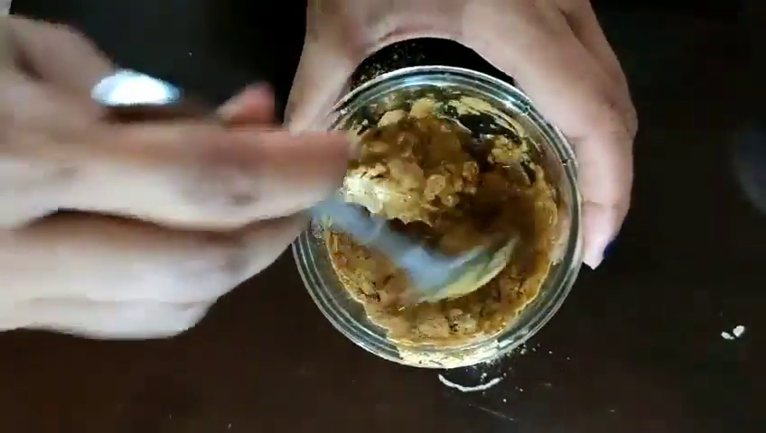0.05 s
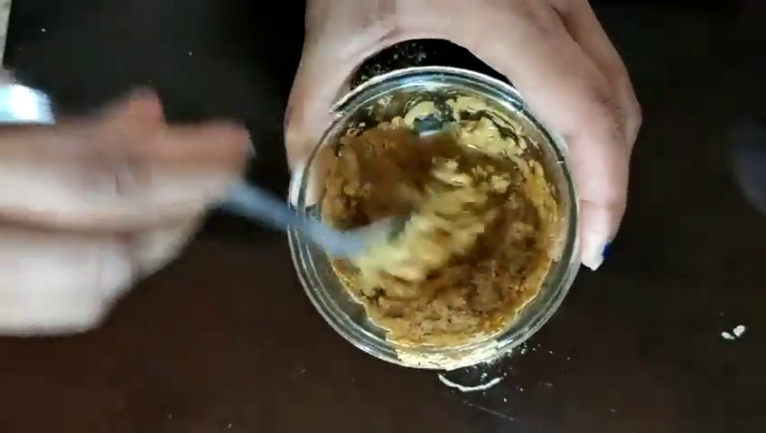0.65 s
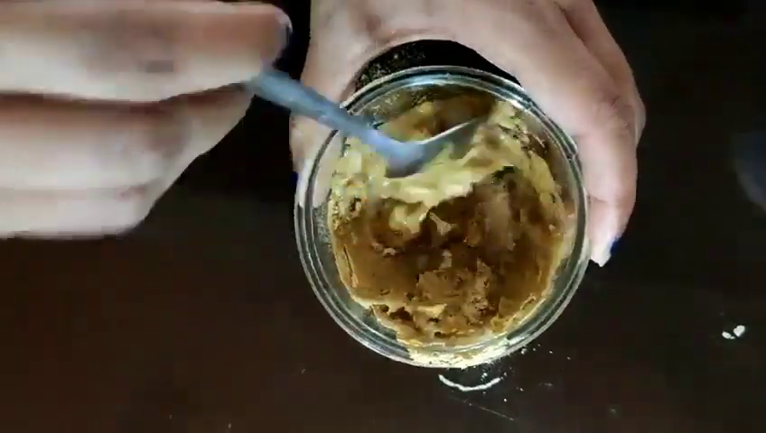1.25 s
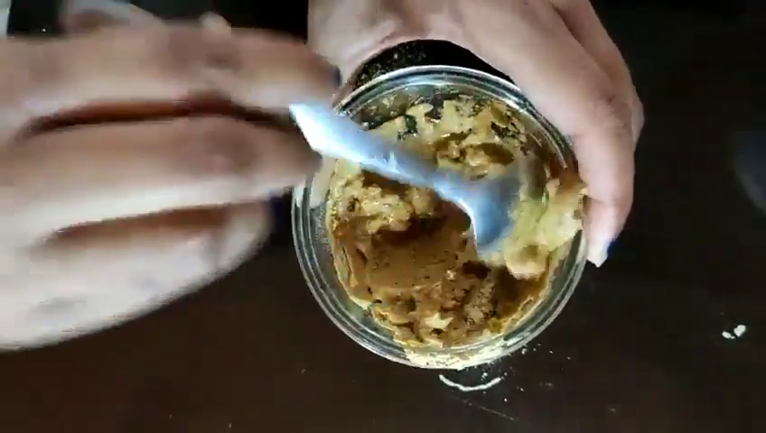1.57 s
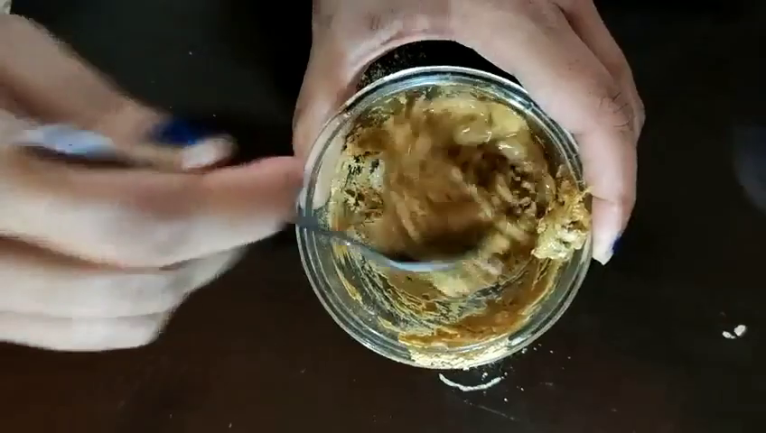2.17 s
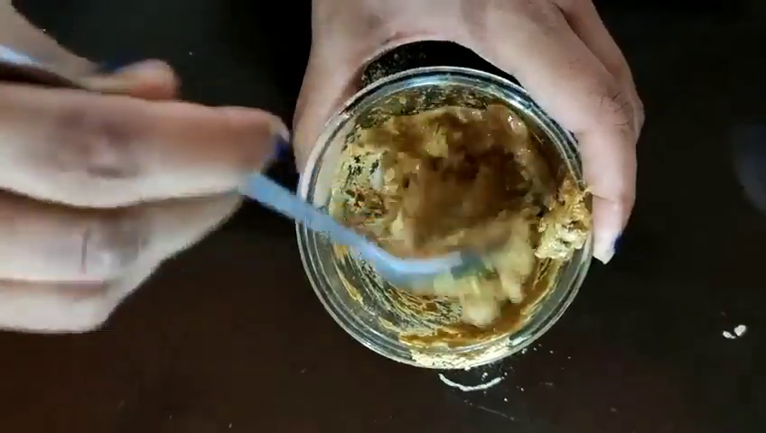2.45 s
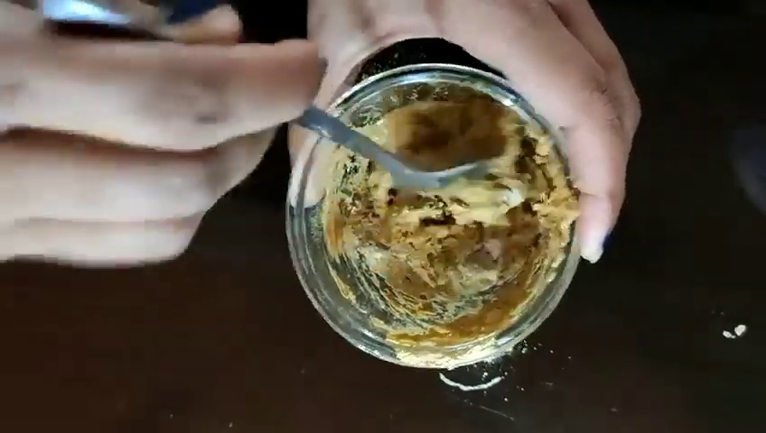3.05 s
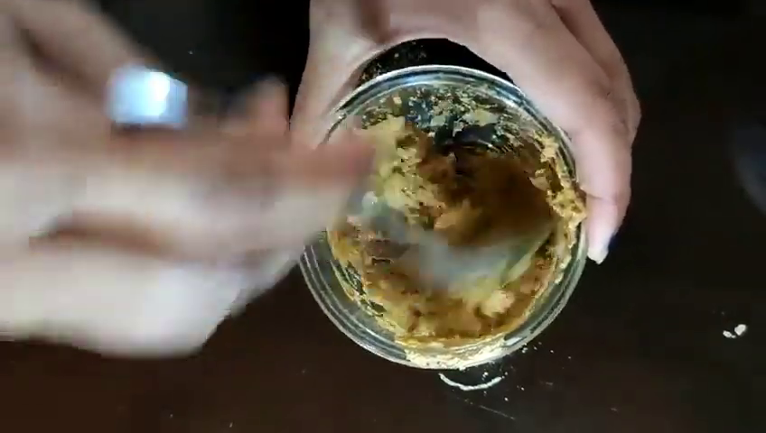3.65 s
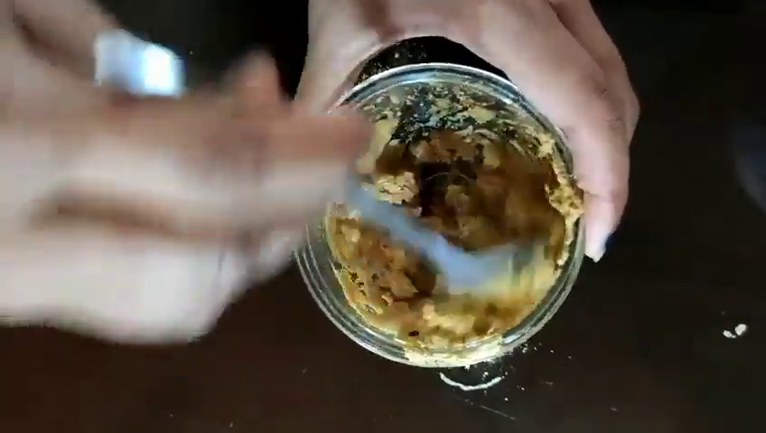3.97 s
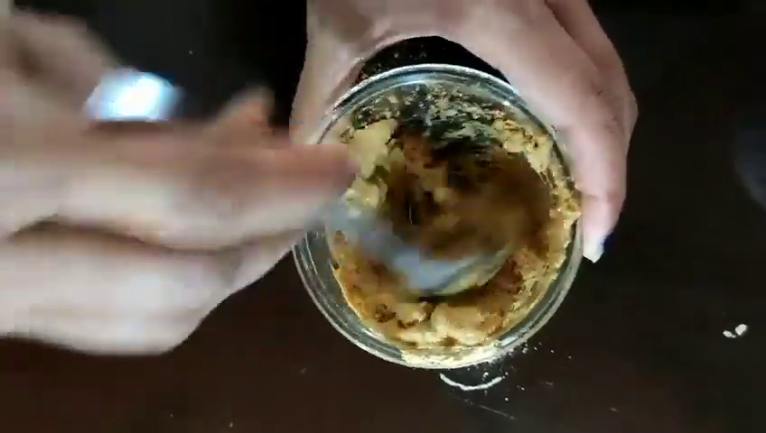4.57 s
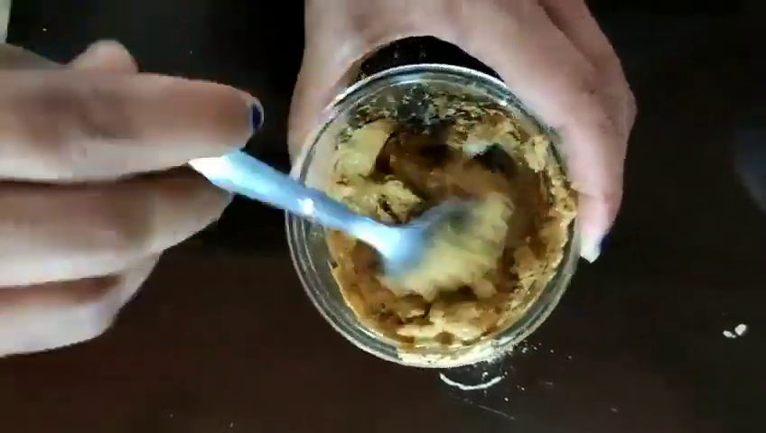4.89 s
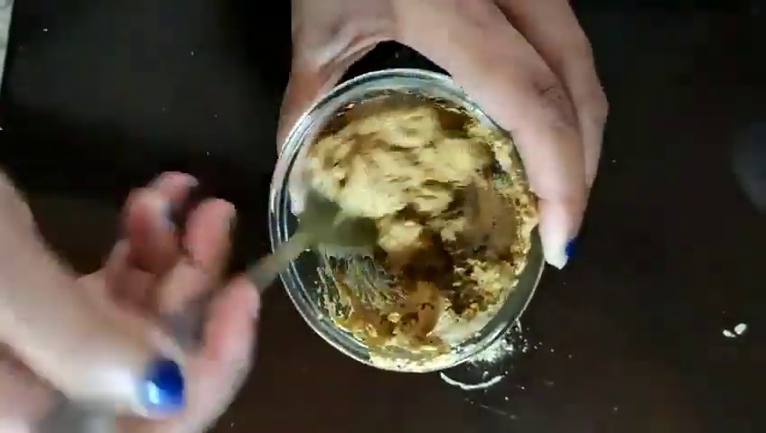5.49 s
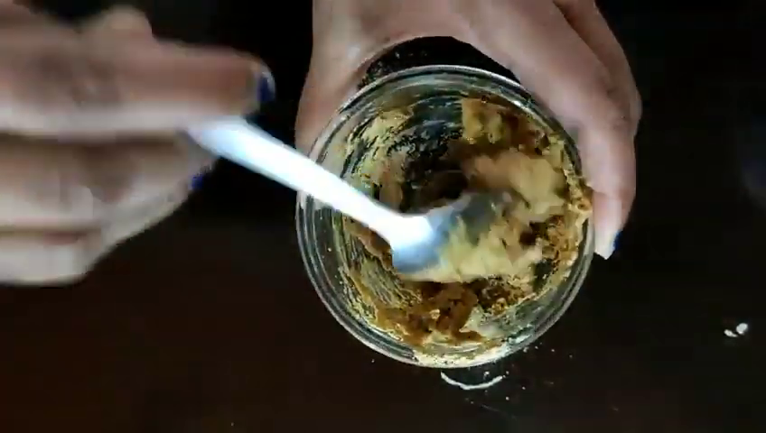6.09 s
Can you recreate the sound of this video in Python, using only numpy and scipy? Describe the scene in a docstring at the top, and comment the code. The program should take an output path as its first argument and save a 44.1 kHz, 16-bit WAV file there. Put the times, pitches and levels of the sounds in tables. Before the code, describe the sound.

A steel spoon stirs thick paste in a hand-held glass jar, close to a stereo microphone. Short, damped clinks come at uneven intervals over soft dragging, gritty scraping and small wet pops. The jar knocks dully on a wooden table, most firmly at about 0.1, 1.0, 1.3 and 2.3 seconds, then more lightly until nearly 5 seconds. The sharpest spoon taps fall at about 1.3, 1.6, 3.7, 4.4 and 4.5 seconds, some leaving a faint, thin metallic ring. The spoon squeaks briefly on the glass near 0.3, 4.2 and 4.9 seconds. Scraping and sticky crackling swell around 2 seconds and are busiest from 3.5 to 5. A longer squeaky scrape comes at about 5.4 seconds, after which only soft taps and crackles continue until just past 6 seconds. The small, bare room adds short echoes, with a faint rumble, appliance hum and hiss underneath.

```python
"""Stirring paste in a glass jar

A steel spoon stirs thick paste in a hand-held jar on a wooden table, close to a stereo microphone.
The spoon taps, scrapes and squeaks on the glass, the paste crackles, the jar rocks and knocks.
Hand and paste damp the glass within milliseconds; a small, bare room adds the tails."""
import sys
import numpy as np
from scipy import signal
from scipy.fft import rfft, irfft, next_fast_len
from scipy.io import wavfile
from scipy.ndimage import uniform_filter1d, map_coordinates

SR = 44100
rng = np.random.default_rng(int(sys.argv[2]) if len(sys.argv) > 2 else 0)


def wav_out(sig):
    """Save sig, one row per channel (or a flat mono array), as 16-bit PCM at SR to the path in sys.argv[1]."""
    wavfile.write(sys.argv[1], SR, np.round(np.clip(np.atleast_2d(sig).T, -1, 1) * 32767).astype(np.int16))


N = 279153
TOP_HZ = 16100
CLUMPS_PER_S = 32  # the paste lets go in clumps
RING_AGE_S = np.arange(10000) / SR
CRACK_AGE_S = np.arange(1024) / SR

# jar on the table top: mode_hz, relative_db, t60_s
THUMP_MODES = [(323, -1, 0.018), (392, 18.5, 0.018), (563, -14.5, 0.052)]
# the jar's thick base: mode_hz, relative_db, t60_s
BASE_MODES = [(763, 6.2, 0.023), (962, 12, 0.013), (1192, 4.6, 0.015), (1500, 12, 0.008)]
# rasping noise: freq_hz, relative_db
RASP_SPECTRUM = [(500, -37.5), (1700, 1.5), (2700, 6.5), (3400, 11.5), (5000, -1.5), (6200, -7), (9000, -6),
                 (10500, -2.5), (13000, -10.5), (16000, -48)]


def amp(db):
    """Decibels to gain."""
    return 10 ** (np.asarray(db) / 20)


def decay(age_s, t60_s):
    """Envelope falling 60 dB in t60_s."""
    return np.exp(-np.log(1000) * age_s / t60_s)


def unit(x):
    """Scale to rms 1."""
    return x / np.sqrt(np.mean(x ** 2) + 1e-20)


def unit_burst(x):
    """Scale the loudest 4 ms to rms 1."""
    return x / np.sqrt(uniform_filter1d(x ** 2, 176, mode="constant").max())


def along(points, hz):
    """Interpolate (freq_hz, value) points on a log axis."""
    freq_hz, values = np.transpose(points)
    return np.interp(np.log(hz + 1), np.log(freq_hz + 1), values)


def wobble(knots_per_s, count=N):
    """Smooth random curve."""
    knots = rng.standard_normal(int(count * knots_per_s / SR) + 4)
    return map_coordinates(knots, [np.arange(count) * knots_per_s / SR])


def filtered(x, response):
    """Apply the gain response(hz)."""
    count = x.shape[-1]
    padded = next_fast_len(count + count // 8)
    return irfft(rfft(x, padded) * response(np.fft.rfftfreq(padded, 1 / SR)), padded)[..., :count]


def coloured(x, spectrum):
    """Shape by (freq_hz, relative_db) points; rms 1."""
    return unit(filtered(x, lambda hz: amp(along(spectrum, hz))))


def add(track, start_s, sound):
    """Mix a stereo sound into the track."""
    part = track[:, max(round(start_s * SR), 0):][:, :sound.shape[1]]
    part += sound[:, :part.shape[1]]


def ring(modes, attack_s, detune, scatter_db=2, pitch_ratio=1, rough=0):
    """Damped modes: grip and contact point shift them at each blow, grinding smears them."""
    hz, db, t60_s = np.transpose(modes)[:, :, None]
    shift, strength = rng.standard_normal((2, len(modes), 1))
    smeared_s = RING_AGE_S + rough * np.cumsum(wobble(2000, len(RING_AGE_S))) / SR
    phase = 2 * np.pi * pitch_ratio * hz * (1 + detune * shift) * smeared_s
    waves = amp(db + scatter_db * strength) * decay(RING_AGE_S, t60_s) * np.sin(phase)
    return -unit_burst(waves.sum(0) * (1 - np.exp(-RING_AGE_S / attack_s)))


def jar_knocks(firm_landing_db=-25):
    """The jar tips and lands: a thump and a dull clack set table and room booming."""
    # landings: start_s, thump_db, clack_db, thump_hz
    landings = [(0.143, -27.5, -30, 340), (0.25, -42, -46, 357), (0.656, -53, -74, 354),
                (0.9941, -25.5, -28, 387), (1.03, -54, -42, 383), (1.304, -33.5, -38, 346),
                (1.874, -43, -52, 360), (2.085, -66, -49.5, 373), (2.29, -26, -39, 335),
                (2.325, -40, -54, 380), (3.02, -47, -50, 384), (3.124, -40.5, -52, 343),
                (3.338, -52.5, -47.5, 420), (3.403, -44, -46, 358), (3.459, -42.5, -54, 313),
                (4.09, -44.5, -55, 342), (4.427, -46, -52, 384), (4.473, -39.5, -55.5, 354),
                (4.672, -42, -55, 316), (4.831, -42.5, -51.5, 361)]
    # table top: mode_hz, relative_db, t60_s
    table_modes = [(122, 0, 0.22)]
    # standing waves: mode_hz, relative_db, t60_s
    room_modes = [(285.5, -6.5, 0.39), (332, -22, 0.14), (397, -6.5, 0.14), (558, -6, 0.3),
                  (728, -12, 0.24)]
    out = np.zeros((2, N))
    for start_s, thump_db, clack_db, thump_hz in landings:
        ratio = thump_hz / THUMP_MODES[1][0]
        thump = amp(thump_db) * ring(THUMP_MODES, attack_s=0.0054, detune=0.0023, pitch_ratio=ratio)
        clack = amp(clack_db - 2) * ring(BASE_MODES, attack_s=0.00099, detune=0.019, rough=0.16)
        add(out, start_s, in_room(thump + clack, wet_db=-4, gap_s=0.009))
        # a flat landing clacks less and booms more
        shove_db = 1.15 * (thump_db - firm_landing_db) + 0.75 * (thump_db - clack_db)
        table = amp(shove_db - 51) * ring(table_modes, attack_s=0.012, detune=0.005)
        boom = amp(thump_db - 19) * ring(room_modes, attack_s=0.0097, detune=0.004)
        add(out, start_s, np.tile(table + boom, (2, 1)))  # long waves reach both channels alike
    return out


def spoon_taps(contact_s=0.00016, lead_in_s=0.0025):
    """Steel hits glass: wall, base and spoon ring under a crack; a faint hiss swells just before."""
    # blows: start_s, wall_db, base_db, steel_db, crack_db, wall_hz
    blows = [(.127, -55, -42.5, -74, -48.5, 1770), (0.5711, -53, -82, -67, -50.5, 1760),
             (0.9645, -45, -45, -48.5, -41, 1840), (1, -42.5, -50.5, -72.5, -61, 1480),
             (1.291, -44.5, -40, -64, -61, 1700), (1.307, -31, -38.5, -48.5, -28, 1320),
             (1.5958, -31.5, -33.5, -25, -30.5, 1853), (1.933, -45, -52, -46, -38, 1830),
             (2.29, -51, -52, -72, -49, 1480), (3.091, -41, -42, -49.5, -42.5, 1750),
             (3.49, -52.5, -53, -75.5, -76, 1760), (3.661, -31, -50, -33, -29.5, 1954),
             (3.805, -44.5, -39.5, -70, -65, 1664), (3.958, -49, -66, -69, -62, 1850),
             (4.013, -42.5, -59, -62, -73, 1870), (4.136, -46.5, -49, -61, -75, 1590),
             (4.35, -33.5, -47.5, -39.5, -36.5, 1864), (4.4969, -44.5, -42, -69, -50, 1680),
             (4.507, -30, -38.5, -57, -32, 1987), (5.2411, -45, -41.5, -42, -47.5, 1790),
             (5.534, -55, -59, -62, -48.5, 1820), (5.552, -52, -67, -59, -51.5, 1820),
             (6.054, -58.5, -75, -77, -76, 1640)]
    # damped glass wall: mode_hz, relative_db, t60_s
    wall_modes = [(1610, -4.5, 0.018), (1890, 3.5, 0.017), (2755, 4, 0.0062), (3500, -13, 0.0018)]
    # spoon: mode_hz, relative_db, t60_s
    steel_modes = [(4866, 2.5, 0.013), (9000, -3, 0.014), (9480, -10, 0.012), (11600, -12.5, 0.0078)]
    out = np.zeros((2, N))
    for start_s, wall_db, base_db, steel_db, crack_db, wall_hz in blows:
        ratio = wall_hz / wall_modes[1][0]
        wall = ring(wall_modes, attack_s=0.0013, detune=0.012, rough=0.11, pitch_ratio=ratio)
        thump = ring(THUMP_MODES, attack_s=0.0056, detune=0.05)
        clack = ring(BASE_MODES, attack_s=0.00033, detune=0.005, rough=0.09)
        steel = ring(steel_modes, attack_s=0.0043, detune=0.0047, scatter_db=3.5, rough=0.042)
        rings = amp(wall_db) * wall + amp(base_db - 2) * (thump + clack) + amp(steel_db - 1) * steel
        crack = amp(crack_db) * contact_crack()
        click = amp(base_db + 6) * (RING_AGE_S / contact_s - 1) * np.exp(-RING_AGE_S / contact_s)
        rasp = coloured(rng.standard_normal(len(CRACK_AGE_S)), RASP_SPECTRUM)
        lead_in_hiss = amp(crack_db - 17) * rasp * np.exp(-CRACK_AGE_S[::-1] / lead_in_s)
        blow = np.concatenate([lead_in_hiss, rings + crack + click])
        add(out, start_s - CRACK_AGE_S[-1], in_room(blow, wet_db=-3, near_db=-6))
        add(out, start_s, amp(steel_db - 33) * spoon_after_ring())
    return out


def contact_crack(t60_s=0.013, attack_s=0.0008):
    """Noise burst of steel on glass, padded to the length of a ring."""
    # crack: freq_hz, relative_db
    spectrum = [(500, 6), (2000, 18), (4000, 17), (7500, 4), (10000, 3), (13000, -2), (16000, -20)]
    envelope = decay(CRACK_AGE_S, t60_s) * (1 - np.exp(-CRACK_AGE_S / attack_s))
    crack = unit_burst(coloured(rng.standard_normal(len(envelope)), spectrum) * envelope)
    return np.pad(crack, (0, len(RING_AGE_S) - len(crack)))


def spoon_after_ring(pitch_hz=4970, t60_s=1.6, count=30000):
    """The spoon sings on after a blow, smeared by the stirring hand."""
    band = signal.iirpeak(pitch_hz, Q=16, fs=SR)
    noise = rng.standard_normal((2, count))
    tone = unit(signal.lfilter(*band, signal.lfilter(*band, noise)))
    flutter = amp(2.5 * wobble(90, count))
    return tone * flutter * decay(np.arange(count) / SR, t60_s)


def spoon_squeaks(waver_hz=200, slips_per_s=520, slip_spread_db=4.5):
    """The edge chatters on bare glass: slips ring glass and spoon and lock unsteadily on a wall note."""
    # squeaks: middle_s, half_length_s, pitch_hz, note_db, glass_db, steel_db
    squeaks = [(0.302, 0.022, 1719, -44, -45, -58), (1.862, .16, 1760, -73, -68, -60.5),
               (2.018, .03, 1800, -68, -56, -55), (3.707, .022, 1890, -55, -50, -50),
               (4.182, 0.02, 1836, -44.5, -40.5, -45), (4.526, .02, 1945, -53, -42.5, -50),
               (4.85, 0.02, 1897, -39.5, -43, -67), (5.365, .04, 1900, -67, -63, -58),
               (5.416, 0.068, 2614, -45.5, -47.5, -47)]
    # rubbed glass: centre_hz, width_hz, relative_db
    glass_bands = [(1420, 270, -3), (1840, 240, 2.5), (2600, 470, -1.5)]
    # rubbed steel: centre_hz, width_hz, relative_db
    steel_bands = [(4060, 220, -4), (4950, 460, -2), (7150, 720, -10), (8930, 520, -7.5)]
    out = np.zeros((2, N))
    for middle_s, half_length_s, pitch_hz, note_db, glass_db, steel_db in squeaks:
        count = int(2 * half_length_s * SR)
        phase = 2 * np.pi * np.cumsum(pitch_hz + waver_hz * wobble(1172, count)) / SR
        note = amp(note_db) * unit(np.sin(phase) * amp(4 * wobble(1383, count)))
        onsets = rng.random(count) < slips_per_s / SR
        slips = onsets * amp(slip_spread_db * rng.uniform(-2, 2, count))
        rasp = amp(-7) * coloured(rng.standard_normal(count), RASP_SPECTRUM)
        glass = amp(glass_db) * (resonate(slips, glass_bands) + rasp)
        steel = amp(steel_db) * resonate(slips, steel_bands)
        squeak = np.hanning(count) ** 2 * (note + glass + steel)
        add(out, middle_s - half_length_s, in_room(squeak, wet_db=-6.5))
    return out


def resonate(x, bands):
    """Resonances of a rubbed body, with deepened valleys between them; rms 1."""
    def response(hz):
        body = 0
        for k, (centre_hz, width_hz, db) in enumerate(bands):
            damping = 1j * hz * width_hz
            body += (-1) ** k * amp(db) * damping / (centre_hz ** 2 - hz ** 2 + damping)
        return body * np.sqrt(abs(body))
    return unit(filtered(x, response))


def paste_pops(stage_gap_s=0.0035, stage_step_db=-6, attack_s=0.0006):
    """Large air pockets tear open in three quick stages; the smaller the pocket, the higher its note."""
    # pockets: start_s, level_db, pitch_hz
    pockets = [(0.169, -59.5, 4960), (0.353, -61.5, 8100), (0.49, -57.5, 9260), (0.505, -70, 10700),
               (0.525, -61, 11500), (0.59, -56.5, 8650), (0.634, -64, 9500), (0.7, -65, 7500),
               (0.791, -55.5, 8500), (0.805, -77, 9800), (0.827, -53.5, 8900), (0.834, -54.5, 9100),
               (0.8655, -56, 9300), (0.876, -64, 11000), (1.023, -56, 10500), (1.042, -52.5, 4760),
               (1.115, -53, 4540), (1.478, -54.5, 8940), (1.845, -52.5, 8460), (1.858, -54.5, 7750),
               (1.917, -50, 5600), (2.125, -57.5, 11800), (2.1812, -55, 4770), (2.196, -58.5, 7050),
               (2.253, -62, 7450), (2.364, -60, 9500), (2.377, -66, 7040), (2.614, -63.5, 8150),
               (2.824, -63.5, 7200), (2.959, -60, 4400), (3.018, -57, 6200), (3.181, -58, 7450),
               (3.187, -62, 7400), (3.279, -61, 8600), (3.318, -62.5, 5100), (3.526, -52.5, 6060),
               (3.553, -50.5, 7800), (3.564, -52.5, 6500), (3.626, -58, 6270), (3.87, -53, 10100),
               (3.877, -65, 7800), (3.9332, -47, 9150), (3.982, -58.5, 10300), (4.162, -61, 6950),
               (4.217, -43.5, 9000), (4.393, -45, 6060), (4.525, -42, 3700), (4.654, -52, 7360),
               (4.677, -53.5, 8500), (4.889, -46.5, 7000), (4.901, -54.5, 7500), (4.905, -50, 5660),
               (5.166, -60.5, 8200), (5.21, -58, 8500), (5.694, -54, 8200), (5.71, -52, 7650),
               (6.053, -60, 8160), (6.08, -59.5, 9700), (6.156, -58, 9500), (6.305, -53, 5800)]
    # tearing paste: freq_hz, relative_db
    spectrum = [(300, -19), (1500, 19), (4000, 8), (8000, 2), (12500, 15.5), (15000, -14.5), (16000, -9.5)]
    out = np.zeros((2, N))
    for start_s, level_db, pitch_hz in pockets:
        stage_s = np.cumsum([0, *stage_gap_s * rng.uniform(0.5, 2, 2)])
        age_s = np.maximum(CRACK_AGE_S - stage_s[:, None], 0)
        stages = decay(age_s, t60_s=0.008) * (1 - np.exp(-age_s / attack_s))
        envelope = amp(stage_step_db * np.arange(3)) @ stages
        tear = coloured(rng.standard_normal(len(envelope)), spectrum) * envelope
        snap = unit_burst(signal.lfilter(*signal.iirpeak(pitch_hz, Q=1.76, fs=SR), tear))
        add(out, start_s, in_room(amp(level_db + 3) * snap, wet_db=-5.5, count=6144))
    return out


def stirring(idle_crackle_db=-77.5, clump_depth_db=4.5):
    """The spoon drags paste round the jar, grinds grit on the wall and leaves a wet crackle."""
    # shoves at lumps of paste: peak_s, width_s, level_db
    pushes = [(0.02, 0.063, -61), (0.28, 0.13, -55.5), (0.63, 0.027, -63.5), (1.11, 0.37, -60.5),
              (1.4, 0.18, -65.5), (1.93, 0.19, -52.5), (2.1, 0.053, -59), (3.44, 0.18, -58.5),
              (4.48, 0.091, -55.5), (4.71, 0.14, -62.5), (4.84, 0.12, -63), (5.34, 0.2, -55.5)]
    # sweeps along or off the wall: peak_s, width_s, scrape_db, crackle_db
    sweeps = [(0.056, 0.096, -67, -63), (0.304, 0.079, -54.5, -58), (0.61, 0.24, -91, -64),
              (0.959, 0.021, -51.5, -43), (1.024, 0.021, -46.5, -57.5), (1.375, 0.23, -59, -69),
              (1.7, 0.15, -58, -70.5), (1.88, 0.046, -57, -51.5), (1.947, 0.09, -56, -53.5),
              (2.02, 0.034, -50, -57), (2.192, 0.045, -67, -57.5), (2.375, 0.06, -64, -65),
              (2.775, 0.15, -90, -68.5), (3.13, 0.03, -62, -71), (3.152, 0.043, -56.5, -60),
              (3.346, 0.11, -59.5, -57), (3.523, 0.069, -61.5, -55.5), (3.673, 0.1, -52.5, -47),
              (3.823, 0.069, -55, -47), (4.013, 0.091, -54, -48), (4.169, 0.034, -58, -49.5),
              (4.39, 0.075, -47, -51), (4.52, 0.068, -61, -43.5), (4.709, 0.042, -52, -52),
              (4.834, 0.026, -49.5, -74), (5.169, 0.072, -94, -64.5), (5.388, 0.15, -47, -58),
              (5.524, 0.024, -54.5, -70.5), (5.777, 0.09, -84.5, -68.5), (6.042, 0.053, -77, -67),
              (6.182, 0.036, -77, -80)]
    # dragged paste: freq_hz, relative_db
    drag_spectrum = [(100, -22.5), (240, -2.5), (340, 2), (480, -1), (800, -6.5), (1300, -15.5),
                     (3000, -56)]
    # grit on glass: freq_hz, relative_db
    grit_spectrum = [(300, -52), (800, -4.5), (1300, -3), (1850, 9.5), (2250, -1.5), (2700, -2.5),
                     (3300, -6.5), (4200, -9), (4950, -3), (6000, -11), (9000, -13), (11000, -14.5),
                     (16000, -54)]
    peak_s, width_s, gritty_db, sticky_db = np.transpose(sweeps)
    drag_db = strokes_db(pushes, idle_db=-78.5)
    scrape_db = strokes_db(zip(peak_s, width_s, gritty_db), idle_db=-88)
    crackle_db = strokes_db(zip(peak_s, width_s, sticky_db), idle_crackle_db)
    crackle_db += clump_depth_db * wobble(CLUMPS_PER_S)
    judder_db = 2.5 * wobble(70)  # the spoon catches and frees itself
    drag = amp(drag_db + judder_db - 2) * grains(drag_spectrum, per_s=280, spread_db=2.6)
    scrape = amp(scrape_db + judder_db - 3) * grains(grit_spectrum, per_s=650, spread_db=4.5)
    crackle = amp(crackle_db + judder_db - 6.5) * bubbles(per_s=600, spread_db=5.2)
    # sticky threads break even under gentle motion
    thread_db = -82.5 + 0.76 * (crackle_db - idle_crackle_db)
    threads = amp(thread_db) * bubbles(per_s=24, spread_db=5)
    rubbing = in_room(drag + scrape, wet_db=0.5)
    return rubbing + in_room(crackle, wet_db=1.5) + in_room(threads, wet_db=-8.5)


def strokes_db(strokes, idle_db, rise_share=0.45):
    """Level of a gentle steady motion plus strokes that swell and ease off."""
    t = np.arange(N) / SR
    power = np.full(N, amp(idle_db) ** 2)
    for peak_s, width_s, level_db in strokes:
        span = slice(*np.searchsorted(t, [peak_s - 2 * width_s, peak_s + 2 * width_s]))
        flank_s = width_s * np.where(t[span] < peak_s, rise_share, 1 - rise_share)
        power[span] += (amp(level_db) * np.exp(-((t[span] - peak_s) / flank_s) ** 2)) ** 2
    return 10 * np.log10(power)


def grains(spectrum, per_s, spread_db):
    """Tiny slips of uneven size at random moments; rms 1."""
    sizes = amp(spread_db * np.clip(rng.standard_normal(N), -2, 2))
    onsets = rng.random(N) < per_s / SR
    return coloured(onsets * rng.choice([-1, 1], N) * sizes, spectrum)


def bubbles(per_s, spread_db, middle_hz=7400, spread_octaves=0.44, decay_cycles=1.5, length=96):
    """Tiny air pockets burst at random, each ringing a few cycles at its own pitch; rms 1."""
    # wet crackle: freq_hz, relative_db
    spectrum = [(1000, -11), (3000, 6), (5000, -1), (6500, -1), (9000, 4.5), (11000, 6), (13000, 3),
                (16000, -18)]
    count = int(per_s * N / SR)
    starts = rng.integers(0, N, (count, 1))
    shift, strength = np.clip(rng.standard_normal((count, 2)), -2, 2).T[:, :, None]
    clump_octaves = 0.34 * wobble(CLUMPS_PER_S)[starts]  # pockets in one clump are alike in size
    pitch_hz = np.minimum(middle_hz * 2 ** (spread_octaves * shift + clump_octaves), TOP_HZ)
    cycles = pitch_hz * np.arange(length) / SR
    waves = amp(spread_db * strength) * np.exp(-cycles / decay_cycles) * np.sin(2 * np.pi * cycles)
    positions = starts + np.arange(length)
    return coloured(np.bincount(positions.ravel(), waves.ravel(), N + length)[:N], spectrum)


def in_room(x, wet_db, near_db=-3, gap_s=0.0032, count=14336, left_lag_samples=6):
    """Jar to microphone: direct sound, scatter from hands and table, then a diffuse tail."""
    # room decay: freq_hz, t60_s
    decay_times = [(120, 0.64), (400, 0.3), (1000, 0.47), (2500, 0.34), (5000, 0.4), (9000, 0.39),
                   (14000, 0.51)]
    # tail colour: freq_hz, gain_db
    tail_gains = [(100, 4), (350, -2.5), (1000, 0.5), (2000, -5), (5000, -5), (9000, -0.5), (13000, -5)]
    hz, age_s, frames = signal.stft(diffuse(count), SR, nperseg=256)
    t60_s = along(decay_times, hz)[:, None]
    unit_energy = np.sqrt(2 * np.log(1000) / (t60_s * SR))
    envelope = amp(along(tail_gains, hz)[:, None] + wet_db) * decay(age_s, t60_s) * unit_energy
    tail = signal.istft(frames * envelope, SR, nperseg=256)[1]
    response = np.pad(tail, ((0, 0), (int(gap_s * SR), 0)))
    # only short waves scatter, differently to each side
    scatter = rng.standard_normal((2, len(CRACK_AGE_S))) * decay(CRACK_AGE_S, t60_s=0.009)
    scatter = signal.lfilter(*signal.butter(2, 2600, "high", fs=SR), scatter)
    response[:, :len(CRACK_AGE_S)] += amp(near_db) * scatter / np.linalg.norm(scatter[0])
    response[0, left_lag_samples] += 1
    response[1, 0] += 1
    return signal.fftconvolve(x[None], response, axes=1)[:, :N]


def diffuse(count):
    """White stereo noise from all sides: alike in the bass, nearly unrelated in the treble."""
    # left-right likeness: freq_hz, correlation
    likeness = [(30, 0.78), (300, 0.82), (700, 0.013), (1400, 0), (3000, 0.17), (12000, 0)]

    def mid_side_gains(hz):
        angle = np.arccos(along(likeness, hz)) / 2
        return np.array([np.cos(angle), np.sin(angle)])
    mid, side = filtered(rng.standard_normal((2, count)), mid_side_gains)
    return np.array([mid + side, mid - side])


def background(rumble_db=-57, hiss_db=-73.5):
    """Room rumble, a distant appliance's wavering hum and thin microphone hiss."""
    # room tone: freq_hz, relative_db
    rumble_spectrum = [(12, -12.5), (22, 9.5), (53, 3.5), (85, -5.5), (120, -5.5), (200, -2), (270, -14),
                       (400, -15.5), (520, -29), (950, -30), (3400, -68.5), (16000, -50.5)]
    # appliance: pitch_hz, level_db
    hum_tones = [(160, -64.5), (210, -64.5)]
    # microphone noise: freq_hz, relative_db
    hiss_spectrum = [(3000, -41.5), (6500, -0.5), (8400, 19.5), (10500, 10), (13000, 8), (14500, -20),
                     (16000, -25)]
    t = np.arange(N) / SR
    hum = np.zeros(N)
    for pitch_hz, level_db in hum_tones:
        gain = amp(level_db + 1.1 * wobble(8.1))
        hum += gain * np.sin(2 * np.pi * pitch_hz * t + 1.1 * wobble(15))
    rumble = amp(rumble_db) * coloured(diffuse(N), rumble_spectrum)
    hiss = amp(hiss_db) * coloured(diffuse(N), hiss_spectrum)
    return rumble + hum + hiss


def scene():
    """Stereo sum of jar, spoon, paste and background."""
    return jar_knocks() + spoon_taps() + paste_pops() + spoon_squeaks() + stirring() + background()


def record(dry):
    """Brick-wall low-pass at TOP_HZ."""
    return filtered(dry, lambda hz: hz < TOP_HZ)


dry = scene()
out = record(dry)
wav_out(out)
```